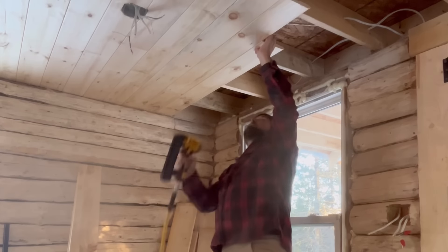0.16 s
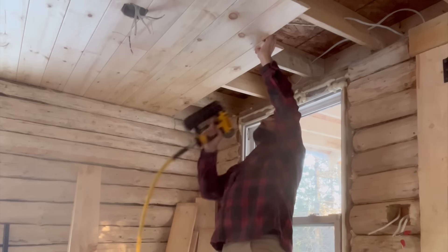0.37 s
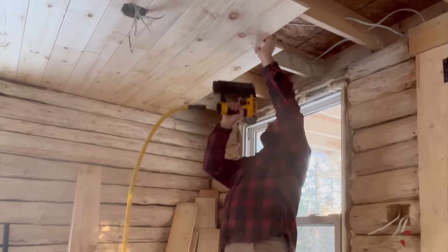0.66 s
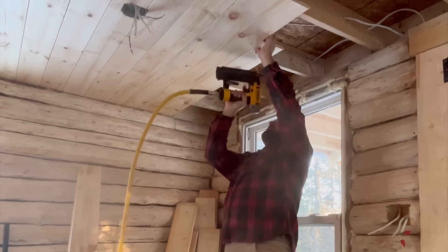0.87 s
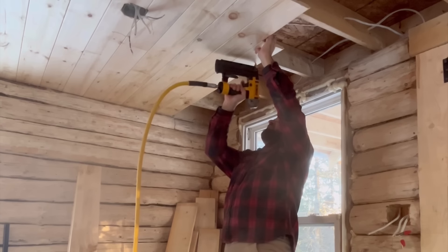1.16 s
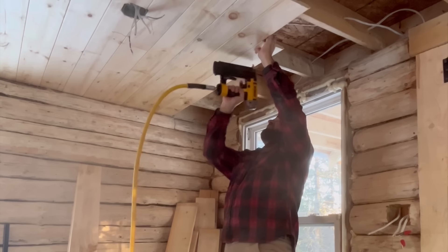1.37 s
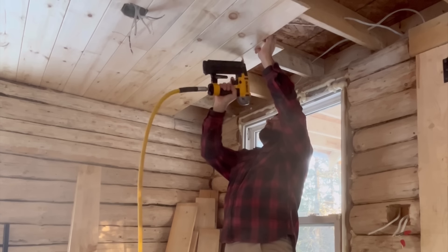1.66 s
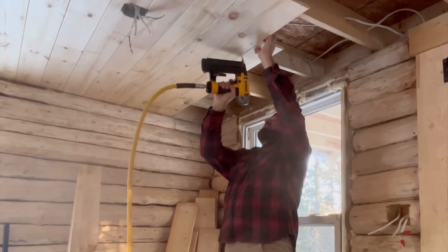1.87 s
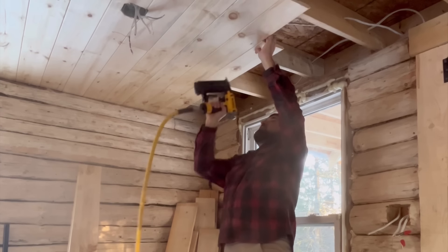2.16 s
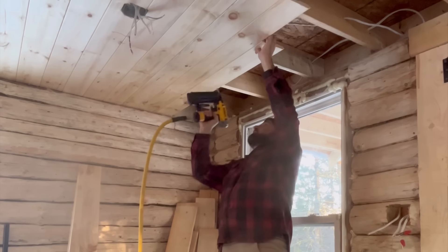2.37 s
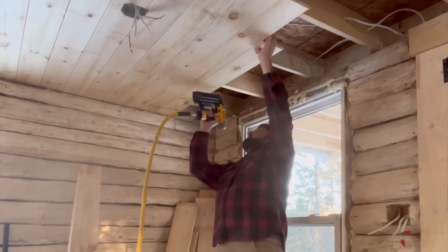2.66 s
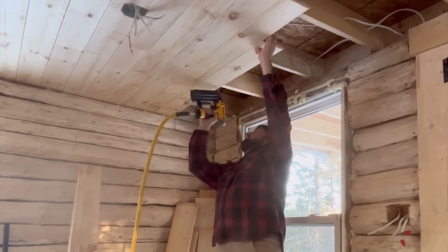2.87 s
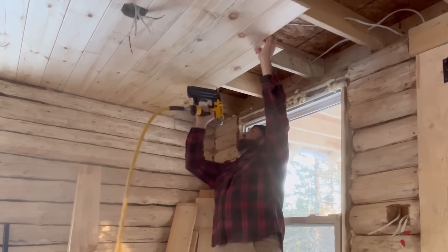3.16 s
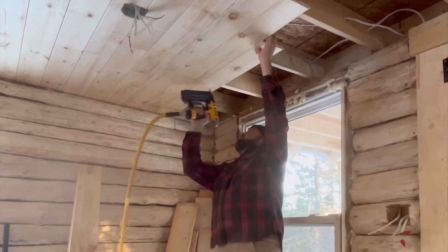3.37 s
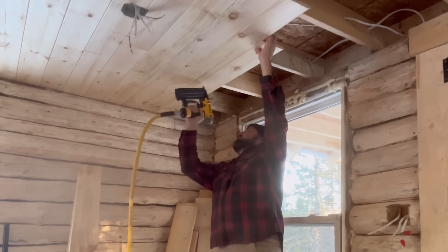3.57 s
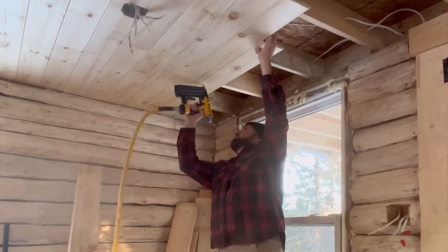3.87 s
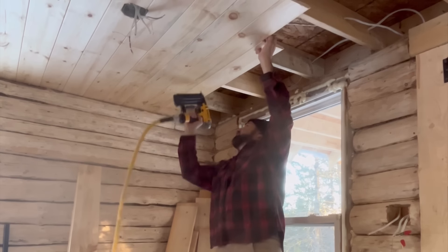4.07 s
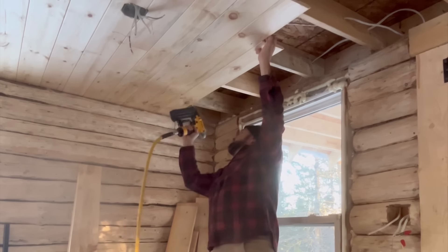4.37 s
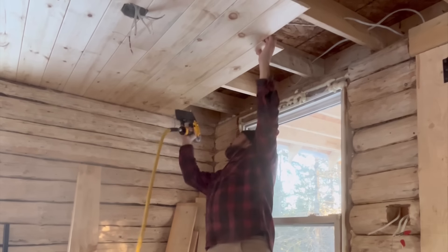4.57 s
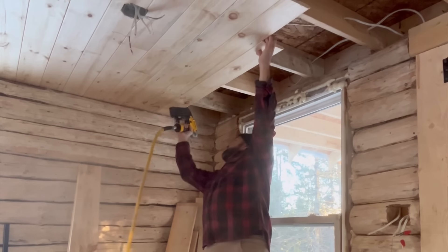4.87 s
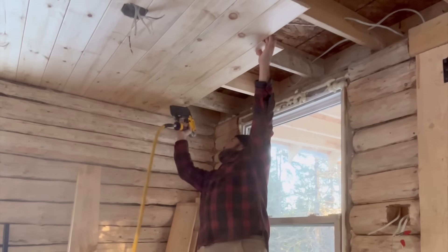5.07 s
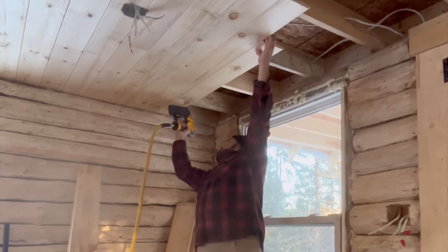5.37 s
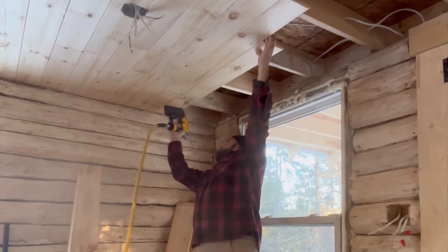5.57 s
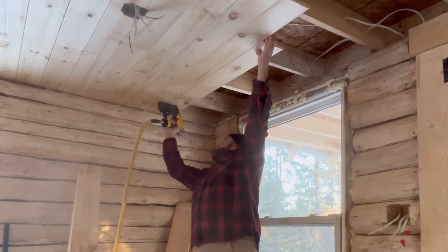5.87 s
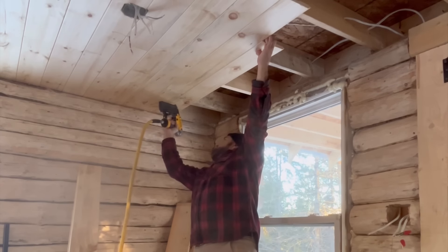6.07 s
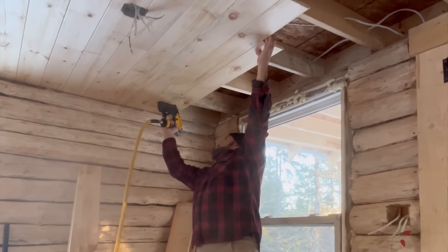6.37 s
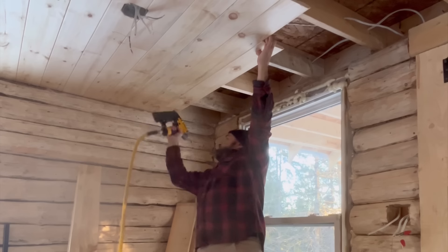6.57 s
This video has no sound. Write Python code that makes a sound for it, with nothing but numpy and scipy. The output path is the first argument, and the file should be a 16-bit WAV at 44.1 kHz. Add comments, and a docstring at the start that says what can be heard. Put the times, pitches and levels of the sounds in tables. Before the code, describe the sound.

Bare log room with a short, lively decay, heard through two closely spaced microphones. A low, faint compressor chugs outside under a quiet room hush. After a hose drag and a woody bump, two nail gun shots come close together, then two more, then a last two, each cracking sharply and spitting compressed air. The tool taps and clicks against the boards between shots, finally sliding along the wood.

```python
"""A hose scrapes over the floor and a sleeve brushes, above the thud of a compressor outside and a faint room hush.
Then six nails go into a pine ceiling in a bare log room: each is a trigger hiss, a driver blow with the ring
of the housing and boards, and a burst of exhaust. Around the shots the nailer knocks, clicks and slides.
Contacts and air are shaped noise, ringing parts are damped sines, and the compressor is a harmonic hum with
pulsing noise. Two closely spaced microphones listen."""
import sys
import numpy as np
from scipy import signal
from scipy.fft import rfft, irfft, next_fast_len
from scipy.io import wavfile
from scipy.ndimage import map_coordinates

SR = 44100
rng = np.random.default_rng(int(sys.argv[2]) if len(sys.argv) > 2 else 0)


def generate_wav(signal):
    """Clip the signal to [-1, 1] and save it as 16-bit WAV at the path in sys.argv[1]."""
    frames = np.transpose(np.atleast_2d(signal))
    scaled = np.clip(frames, -1, 1) * 32767
    pcm = np.round(scaled).astype(np.int16)
    wavfile.write(sys.argv[1], SR, pcm)


N = 296793
AGE = np.arange(int(.8 * SR)) / SR  # seconds since the onset of a single sound

# All spectra and mode levels are relative; each sound is levelled afterwards.
# nail shots: trigger_s, hiss_db, blow_db, favoured_housing_hz, release_s
NAIL_SHOTS = [(1.1775, -19.2, -13.2, 1350, 1.303), (1.8235, -19.4, -14, 1700, 1.9195),
              (3.0895, -24.6, -13.2, 2000, 3.2135), (3.8105, -26.6, -11.6, 2100, 3.9295),
              (5.366, -24.2, -11.2, 1400, 5.471), (6.31, -23.7, -13.2, 2300, 6.4375)]
# hiss of the trigger valve: pitch_hz, level_db (per Hz)
TRIGGER_SPECTRUM = [(60, 0), (300, -1), (800, -1), (1300, -8.5), (2400, 2), (3500, -0.4), (5400, -2.5),
                    (9000, -3), (14000, -3.5)]
# crack of the driver blow: pitch_hz, level_db (per Hz)
BLOW_SPECTRUM = [(60, -17), (250, -2), (700, -1.5), (1400, -1.5), (2200, 1), (3000, -2), (4500, -4),
                 (7000, -8), (10000, -15.5), (14000, -20.5)]
# ringing housing and magazine of the nailer: pitch_hz, level_db, t60_s
HOUSING_MODES = [(1221, -1, 0.066), (1376, -4, 0.05), (1497, -2, 0.035), (1968, -5, 0.084),
                 (2205, 3.5, 0.024), (2525, -4.5, 0.071), (2900, -4.5, 0.055), (4220, -2, .06),
                 (4680, 0.5, 0.073), (7100, -6.5, .05)]
# boards rattling on their joists: pitch_hz, level_db (per Hz)
RATTLE_SPECTRUM = [(30, -15), (70, -3), (130, -6), (250, 1), (410, -3.5), (580, 4.5), (900, -1.5),
                   (1300, -5), (2400, -4), (5000, -6), (8000, -19.5), (13000, -29)]
# ringing ceiling boards: pitch_hz, level_db, t60_s
BOARD_RESONANCES = [(151.6, -5, 0.3), (171.5, 0, 0.25), (187, -5, 0.14), (210.5, -1.5, 0.34),
                    (233.4, 0, 0.33), (267.3, -3.5, 0.25), (296, -5, 0.3), (342.8, -0.5, 0.19),
                    (363.7, -0.5, 0.24), (558, -3, .2), (710, -6.5, 0.19)]
# bright puff as the exhaust valve opens: pitch_hz, level_db (per Hz)
PUFF_SPECTRUM = [(60, -13.5), (400, -6), (1100, -10.5), (2200, -1), (4300, -3.5), (7000, 0.5), (9500, -1.5),
                 (13000, -3), (15000, -4)]
# turbulent exhaust jet: pitch_hz, level_db (per Hz)
JET_SPECTRUM = [(30, -11), (70, 2), (160, -5.5), (500, -5.5), (1100, -8), (2200, -5), (3000, -4.5),
                (4300, 0.3), (6000, -1), (8000, -6), (11000, -10.5), (14500, -6)]
# last air seeping through the deflector: pitch_hz, level_db (per Hz)
SEEP_SPECTRUM = [(100, -15.5), (1000, -10), (2500, -14.5), (5000, 4), (8000, -1.5), (14500, -2)]
DRIVER_DELAY_S, RECOIL_DELAY_S = .034, .0165  # trigger to blow, blow to the nose dropping back
RECOIL_DB, EXHAUST_DB = -19.5, -13.5  # the same for every shot

# the nailer knocks against the ceiling: start_s, wood_db, metal_db, favoured_board_hz
CEILING_KNOCKS = [(.789, -39.5, -52.5, 363), (0.9994, -25, -38, 223.8), (1.049, -38, -66, 109.9),
                  (1.538, -43, -42.5, 135.3), (1.667, -50, -58, 134.6), (2.907, -41.5, -53.5, 185),
                  (3.689, -42, -48, 194.3), (4.115, -55, -74.5, 101), (4.212, -45, -57.5, 171),
                  (4.545, -49.5, -64, 358), (4.572, -34, -51.5, 335), (4.831, -46, -58.5, 355),
                  (5.058, -43.5, -56, 194), (5.73, -43.5, -48, 160), (5.768, -46, -67.5, 328),
                  (6.296, -44.5, -66, 134)]
# metal tick of a touch: pitch_hz, level_db (per Hz)
TICK_SPECTRUM = [(900, -26.5), (2500, -7), (5000, -0.5), (8000, -1), (14000, -12.5)]
# woody knock, also the body of a click: pitch_hz, level_db (per Hz)
KNOCK_SPECTRUM = [(250, -11), (550, 3.5), (850, 2.5), (1400, -3.5), (2000, -11), (2800, -9), (3600, -18),
                  (5500, -31.5)]
# low boom of the joists: pitch_hz, level_db (per Hz)
BOOM_SPECTRUM = [(25, -23), (55, 1.5), (78, 7.5), (115, 1.5), (170, -16), (400, -58)]
# bare metal contact is brief, a glancing one long: the rise halves every RISE_HALVES_DB of metal level
RISE_S, RISE_AT_DB, RISE_HALVES_DB = .0038, -52, 12
DULL_DB_PER_OCTAVE = 4.5  # downward tilt of the tick at a rise of RISE_S
# mid-span the boards ring low and the joists boom; stiffer spots ring higher, knock more and boom less
MID_SPAN_HZ = 170
KNOCK_DB, KNOCK_DB_PER_OCTAVE = -5.5, 2.5  # relative to the wood level
BOOM_DB, BOOM_DB_PER_OCTAVE = -2, -12  # relative to the wood level

# loose parts of the nailer click: start_s, level_db
LOOSE_CLICKS = [(0.498, -52.5), (2.535, -74), (2.599, -71), (4.828, -61), (5.287, -60), (5.31, -64),
                (5.977, -67.5)]
# ping of a loose part: pitch_hz, level_db, t60_s
PING_MODES = [(5250, 2, .012), (7690, -8, 0.0088)]
CLICK_BODY_DB = -2  # dull part of a click, relative to its tick

# hose dragging over the floor: start_s, length_s, end_level_db
HOSE_STROKES = [(-.04, 0.055, -24.5), (.184, 0.082, -27.5), (.45, 0.018, -52)]
# scrape of the hose: pitch_hz, level_db (per Hz)
HOSE_SPECTRUM = [(24, -44), (40, -15.5), (70, -1), (258, -13), (381, -0.5), (464, -16.5), (593, -1.5),
                 (1020, -2.5), (1900, -15.5), (4110, -29.5), (7050, -36.5), (11500, -54), (14000, -43)]
# nailer's nose sliding on a board: start_s, length_s, end_level_db
NOSE_STROKES = [(6.24, 0.455, -32.5)]
# rub of the nose on wood: pitch_hz, level_db (per Hz)
NOSE_SPECTRUM = [(35, -21), (75, -1), (120, -5.5), (185, -1), (280, -2.5), (450, -2.5), (680, -13.5),
                 (900, -7.5), (1300, -15.5), (3000, -19.5), (7000, -28.5), (14000, -49)]
# sleeve brushing as the arm shifts: start_s, length_s, end_level_db
SLEEVE_STROKES = [(.05, 0.17, -39), (3.47, 0.093, -60), (4.88, 0.18, -54), (5.91, 0.077, -57.5)]
# rustle of the sleeve: pitch_hz, level_db (per Hz)
SLEEVE_SPECTRUM = [(300, -4), (1200, 0), (2500, -2), (7000, -6.5), (13000, -23)]

# compressor hum: order (multiple of the stroke rate), level_db
STROKE_ORDERS = [(2, -70.6), (3, -76.7), (4, -62.8), (5, -69.2), (6, -65.0), (7, -68.6), (8, -64.9),
                 (9, -69.7), (10, -75.6)]
# chuff of the compressor through the wall: pitch_hz, level_db (per Hz)
CHUFF_SPECTRUM = [(40, -7.5), (75, 0.5), (110, -14), (260, -11.5), (340, -5.5), (470, -3), (600, -22),
                  (1500, -50)]
# faint hush of the room: pitch_hz, level_db (per Hz)
HUSH_SPECTRUM = [(20, -14), (45, -0.5), (78, 0), (115, -14), (260, -14), (330, -8.5), (460, -7), (640, -18),
                 (1200, -17.5), (1900, -25), (4000, -29.5), (8000, -38.5), (15000, -55)]
# gain on compressor and hush together: time_s, gain_db
BACKGROUND_GAIN = [(0, 7.5), (1.75, 8), (2.05, -1.5), (4.4, 0.5), (5.2, 4.5), (6.2, 1)]
PUMP_HZ = 27.45  # piston strokes a second
STROKE_SCATTER_DB = 0.4  # no two piston strokes are quite alike
CHUFF_DB, HUSH_DB = -69, -62  # before the background gain

# decay of the log room: pitch_hz, t60_s
ROOM_DECAY = [(80, 0.33), (300, 0.34), (1000, 0.4), (4000, 0.36), (8000, 0.28), (14000, 0.2)]
# likeness of the two microphones, limited later to +-0.995: pitch_hz, correlation (-1 to 1)
MIC_CORRELATION = [(150, 0.97), (350, 0.81), (900, -0.027), (1800, 0.18), (3200, -0.085), (5500, -0.64),
                   (8200, 0.66), (9550, -.99), (10500, -.99), (11800, 0.38), (13200, 0.97), (14600, -1.1)]
# left-right balance of the microphones: pitch_hz, left_minus_right_db
MIC_BALANCE = [(60, 0.5), (250, 1.5), (700, 4.0), (1600, 2.5), (3500, -2.5), (6000, 0.2), (10000, -0.5)]
# treble droop of the finished sound: pitch_hz, gain_db
TREBLE_DROOP = [(14600, 0), (15300, -6.5), (16000, -8.5)]
TOP_HZ = 16300  # upper limit of the sound


def nailer():
    """The trigger valve hisses, the driver slams the nail home, the ceiling shakes, the cylinder vents on release."""
    out = np.zeros((2, N))
    for trigger_s, hiss_db, blow_db, housing_hz, release_s in NAIL_SHOTS:
        hiss = in_room(burst(TRIGGER_SPECTRUM, attack=.0018, hold=.0046, t60=.18), wet_db=2.5)
        add(out, trigger_s, amp(hiss_db) * unit(hiss, span=.026))

        blow_s = trigger_s + DRIVER_DELAY_S
        crack = unit(burst(BLOW_SPECTRUM, attack=.00014, hold=.006, t60=.025), span=.0067)
        housing = ring(favouring(HOUSING_MODES, housing_hz, slope_db=8.0), attack=.00083)
        metal = amp(-7) * unit(housing, span=.025)
        blow = in_room(crack + metal, wet_db=-4)
        add(out, blow_s, amp(blow_db) * unit(blow, span=.011))

        # the recoil drops the nose back on the boards, which rattle on their joists
        rattle = in_room(burst(RATTLE_SPECTRUM, attack=.0026, hold=.0046, t60=.13), wet_db=-7.5)
        boards = ring(favouring(BOARD_RESONANCES, 240, slope_db=5.0), attack=.0036)
        recoil = unit(rattle, span=.036) + amp(-7) * unit(boards, span=.022)
        add(out, blow_s + RECOIL_DELAY_S, amp(RECOIL_DB) * recoil)

        # the valve snaps open with a bright puff, then the last air seeps out through the deflector
        puff = amp(3) * unit(burst(PUFF_SPECTRUM, attack=.0004, hold=.0053, t60=.026), span=.0076)
        turbulence = amp(1.3 * wobble(300)[:len(AGE)])
        rush = turbulence * burst(JET_SPECTRUM, attack=.01, hold=.019, t60=.19)
        jet = amp(-2) * unit(rush, span=.06)
        seep = amp(-23.5) * unit(burst(SEEP_SPECTRUM, attack=.02, hold=.18, t60=.12), span=.1)
        exhaust = in_room(puff + jet + seep, wet_db=-6.5)
        add(out, release_s, amp(EXHAUST_DB) * unit(exhaust, span=.046))
    return out


def knocks():
    """Each touch ticks on the metal and knocks on the wood; boards and joists take a moment to swing."""
    out = np.zeros((2, N))
    for start_s, wood_db, metal_db, favoured_hz in CEILING_KNOCKS:
        rise = RISE_S * 2 ** ((RISE_AT_DB - metal_db) / RISE_HALVES_DB)
        octaves = np.log2(favoured_hz / MID_SPAN_HZ)

        # a glancing touch builds slowly, scuffs on for longer and is duller
        dull_db = DULL_DB_PER_OCTAVE * rise / RISE_S + 2.5 * max(octaves, 0)
        dulled = [(hz, db - dull_db * np.log2(hz / 2500)) for hz, db in TICK_SPECTRUM]
        tick = in_room(burst(dulled, attack=rise, hold=3.0 * rise, t60=.11), wet_db=-2.5)
        add(out, start_s, amp(metal_db) * unit(tick, span=.08))

        knock = in_room(burst(KNOCK_SPECTRUM, attack=rise, hold=3.8 * rise, t60=.065), wet_db=-3.5)
        knock_db = wood_db + KNOCK_DB + KNOCK_DB_PER_OCTAVE * octaves
        add(out, start_s, amp(knock_db) * unit(knock, span=.097))

        boards = ring(favouring(BOARD_RESONANCES, favoured_hz, slope_db=12.5), attack=.002 + 3 * rise)
        add(out, start_s + .005 + 1.5 * rise, amp(wood_db) * unit(boards, span=.1))

        boom = burst(BOOM_SPECTRUM, attack=.0092, hold=.032, t60=.094)
        boom_db = wood_db + BOOM_DB + BOOM_DB_PER_OCTAVE * octaves
        add(out, start_s + .014, amp(boom_db) * unit(boom, span=.21))
    return out


def clicks():
    """Metal taps on metal: a quick tick and ping with a little body, too light to move the boards."""
    out = np.zeros((2, N))
    for start_s, level_db in LOOSE_CLICKS:
        tick = unit(burst(TICK_SPECTRUM, attack=.0006, hold=.002, t60=.08), span=.08)
        ping = amp(-3) * unit(ring(PING_MODES, attack=.0006), span=.067)
        thump = burst(KNOCK_SPECTRUM, attack=.002, hold=.0055, t60=.06)
        body = amp(CLICK_BODY_DB) * unit(thump, span=.091)
        click = in_room(tick + ping + body, wet_db=-3.5)
        add(out, start_s, amp(level_db) * unit(click, span=.071))
    return out


def hose():
    """The hose drags over the floor in short, slightly rough scrapes."""
    envelope = strokes(HOSE_STROKES, attack=.007, swell_db=5.5, fall_db_per_s=147)
    return rubbing(envelope, HOSE_SPECTRUM, rough_db=1.5, catch_rate=160)


def nose():
    """The nailer's nose slides smoothly on the board, as even friction noise."""
    envelope = strokes(NOSE_STROKES, attack=.013, swell_db=11.5, fall_db_per_s=30)
    return rubbing(envelope, NOSE_SPECTRUM, rough_db=0, catch_rate=200)


def sleeve():
    """Cloth brushes as the arm shifts, catching coarsely."""
    envelope = strokes(SLEEVE_STROKES, attack=.017, swell_db=8, fall_db_per_s=190)
    return rubbing(envelope, SLEEVE_SPECTRUM, rough_db=6.5, catch_rate=78)


def compressor():
    """One thud per piston stroke; the wall smears it and lets only the low orders and a dull chuff through."""
    seconds = np.arange(N) / SR - .0036
    turn = 2 * np.pi * (PUMP_HZ * seconds + .004 * wobble(8))
    thuds = np.zeros(N)
    for order, level_db in STROKE_ORDERS:
        smear = .13 * (order - 6) ** 2  # phase in radians: spreads each thud in time
        thuds -= np.sqrt(2) * amp(level_db) * np.sin(order * turn - smear)
    thuds = thuds * amp(STROKE_SCATTER_DB * wobble(PUMP_HZ))
    pulsing = rng.standard_normal((2, N)) * (1 + .3 * np.cos(turn))
    chuff = unit(coloured(pulsing, CHUFF_SPECTRUM))
    return thuds * np.array([[1], [.3]]) + amp(CHUFF_DB) * chuff


def air():
    """The faint hush of the room: coloured noise whose level wavers slightly."""
    hush = unit(coloured(rng.standard_normal((2, N)), HUSH_SPECTRUM))
    return amp(HUSH_DB + .8 * wobble(10)) * hush


def strokes(rows, attack, swell_db, fall_db_per_s):
    """Each stroke sets in, swells as it gathers speed, and dies away once it ends."""
    power = np.zeros(N)
    for start_s, length_s, end_db in rows:
        age = np.maximum(np.arange(N) / SR - start_s, 0)
        swell = swell_db * np.minimum(age / length_s - 1, 0)
        fall = fall_db_per_s * np.maximum(age - length_s, 0)
        power += (amp(end_db + swell - fall) * (1 - np.exp(-age / attack))) ** 2
    return np.sqrt(power)


def rubbing(envelope, spectrum, rough_db, catch_rate):
    """Friction noise under a stroke; with rough_db above 0 the surface catches and slips unevenly."""
    grains = rng.standard_normal((2, N)) * amp(rough_db * wobble(catch_rate))
    return envelope * unit(in_room(coloured(grains, spectrum), wet_db=-1.0))


def burst(spectrum, attack, hold, t60):
    """Coloured noise that rises, holds and dies away (times in seconds)."""
    shape = (1 - np.exp(-AGE / attack)) * amp(-60 * np.maximum(AGE - hold, 0) / t60)
    return coloured(rng.standard_normal((2, len(AGE))) * shape, spectrum)


def ring(modes, attack):
    """Damped modes, struck at new strengths each time."""
    hz, db, t60 = np.transpose(modes)[:, :, None]
    size = amp(db + rng.normal(0, 2.2, db.shape) - 60 * AGE / t60)
    phase = 2 * np.pi * (hz * AGE + rng.random((2, len(hz), 1)))
    return (size * np.sin(phase)).sum(1) * (1 - np.exp(-AGE / attack))


def favouring(modes, favoured_hz, slope_db):
    """The place of contact decides which modes answer most: the others lose slope_db an octave."""
    return [(hz, db - slope_db * abs(np.log2(hz / favoured_hz)), t60) for hz, db, t60 in modes]


def in_room(x, wet_db):
    """x plus the answer of the log walls, a fresh decaying noise tail for every call."""
    hz, t, z = signal.stft(rng.standard_normal((2, len(AGE))), SR, nperseg=256)
    decay = amp(-60 * t / along(ROOM_DECAY, hz)[:, None])
    tail = signal.istft(z * decay, SR, nperseg=256)[1][:, :len(AGE)]
    tail = tail * (1 - np.exp(-(AGE / .0034) ** 2))  # the walls answer a little late
    wet = signal.fftconvolve(x, tail / np.linalg.norm(tail[0]), axes=1)[:, :x.shape[1]]
    return x + amp(wet_db) * wet


def coloured(x, spectrum):
    """x through a causal minimum-phase filter with the given spectrum."""
    n = x.shape[-1]
    m = 2 * next_fast_len(n // 2 + 2048)
    gain = amp(along(spectrum, np.fft.rfftfreq(m, 1 / SR)))
    cepstrum = irfft(np.log(gain), m)
    # folding the cepstrum onto positive time makes the filter causal
    cepstrum[1:m // 2] *= 2
    cepstrum[m // 2 + 1:] = 0
    return irfft(rfft(x, m) * np.exp(rfft(cepstrum)), m)[..., :n]


def wobble(rate):
    """A smooth random curve, rate knots a second."""
    knots = rng.standard_normal(int(N * rate / SR) + 4)
    return map_coordinates(knots, [np.arange(N) * rate / SR])


def amp(db):
    """Decibels to gain."""
    return 10 ** (np.asarray(db) / 20)


def unit(x, span=None):
    """x scaled to rms 1, over its first span seconds if given."""
    head = x if span is None else x[..., :int(span * SR)]
    return x / np.sqrt(np.mean(head ** 2) + 1e-20)


def along(points, hz):
    """(Hz, value) points read on a log axis."""
    f, v = np.transpose(points)
    return np.interp(np.log(hz + 1), np.log(f), v)


def curve(rows):
    """(s, value) rows, one value per sample."""
    return np.interp(np.arange(N) / SR, *np.transpose(rows))


def add(track, s, sound):
    """Mix a sound into the track at time s."""
    part = track[:, max(round(s * SR), 0):][:, :len(AGE)]
    part += sound[:, :part.shape[1]]


def scene():
    """Sum the nailer, its handling, the rubbing and the background into two channels for the microphone pair."""
    handling = knocks() + clicks() + hose() + nose() + sleeve()
    background = amp(curve(BACKGROUND_GAIN)) * (compressor() + air())
    return nailer() + handling + background


def record(dry):
    """The microphone pair forms sum and difference, in or out of phase by frequency, with nothing above TOP_HZ."""
    m = next_fast_len(N + SR // 2)
    hz = np.fft.rfftfreq(m, 1 / SR)
    alike = np.clip(along(MIC_CORRELATION, hz), -.995, .995)
    mid, side = rfft(dry, m) * np.sqrt([(1 + alike) / 2, (1 - alike) / 2])
    lean = amp(along(MIC_BALANCE, hz) / 2)
    pair = np.array([(mid + side) * lean, (mid - side) / lean])
    low_cut = (1j * hz / (1j * hz + 30)) ** 2  # 30 Hz, second order
    top_cut = 1 / np.sqrt(1 + (hz / TOP_HZ) ** 400)
    return irfft(pair * low_cut * amp(along(TREBLE_DROOP, hz)) * top_cut, m)[:, :N]


dry = scene()
out = record(dry)
generate_wav(out)
```